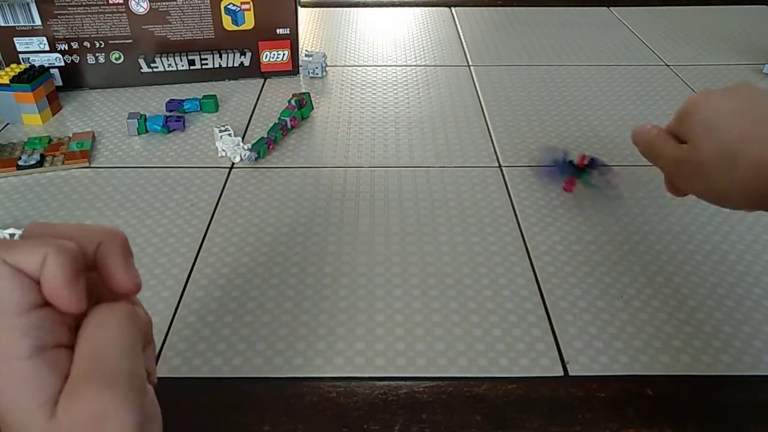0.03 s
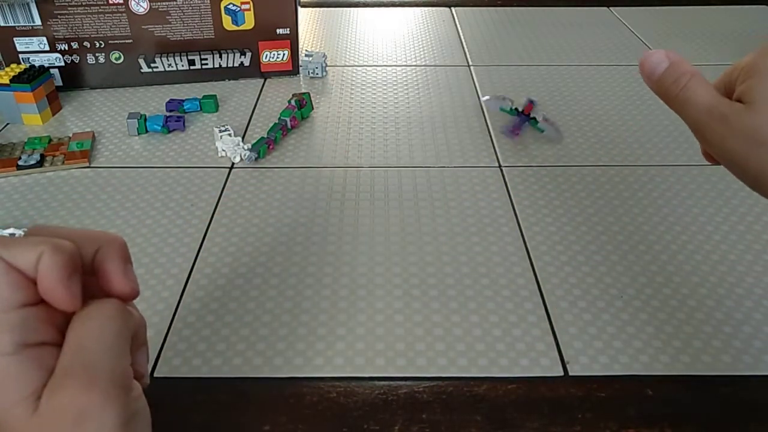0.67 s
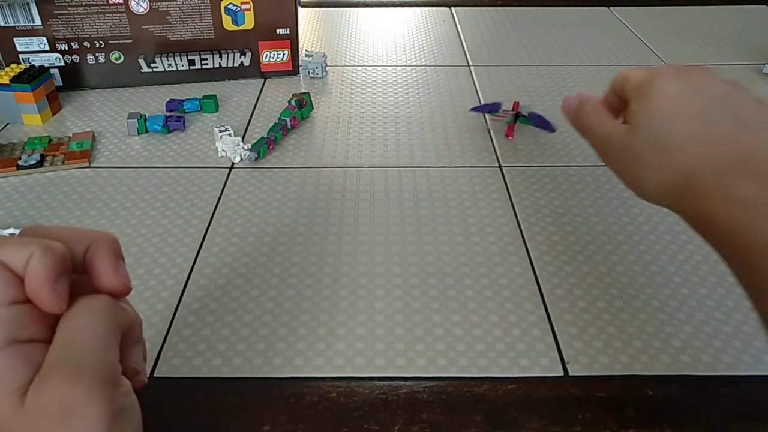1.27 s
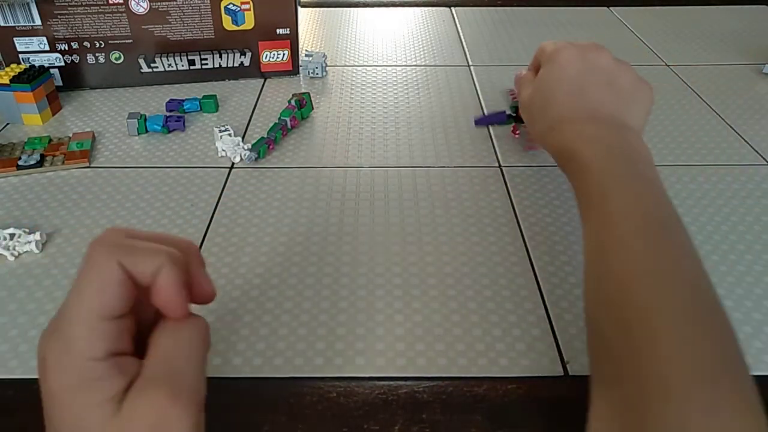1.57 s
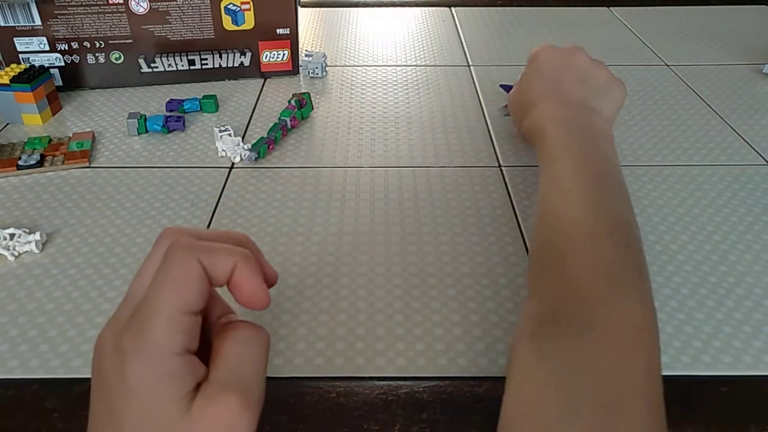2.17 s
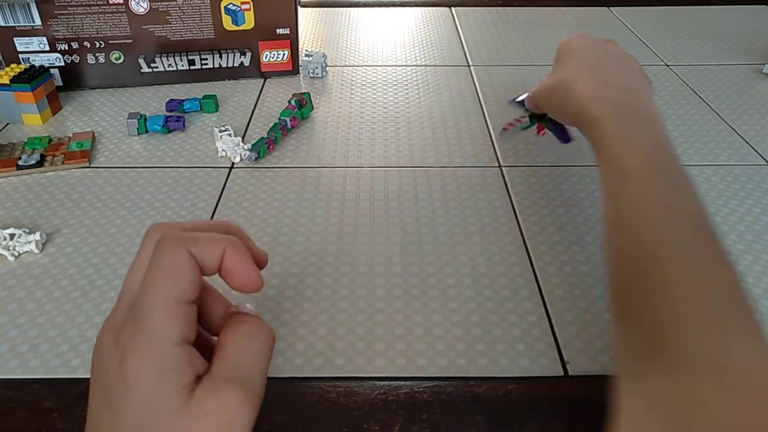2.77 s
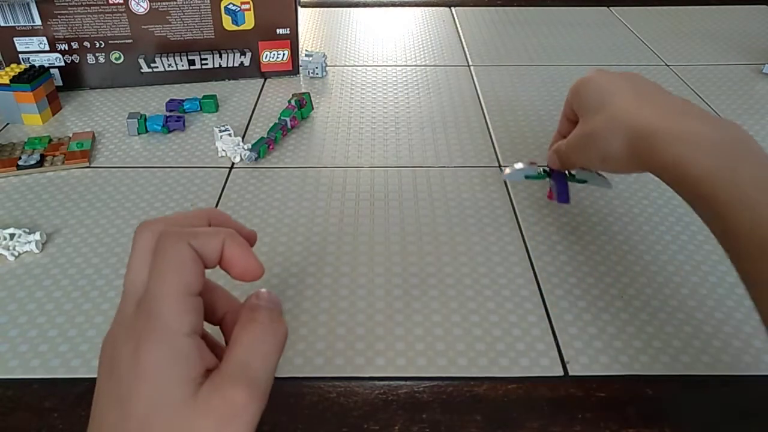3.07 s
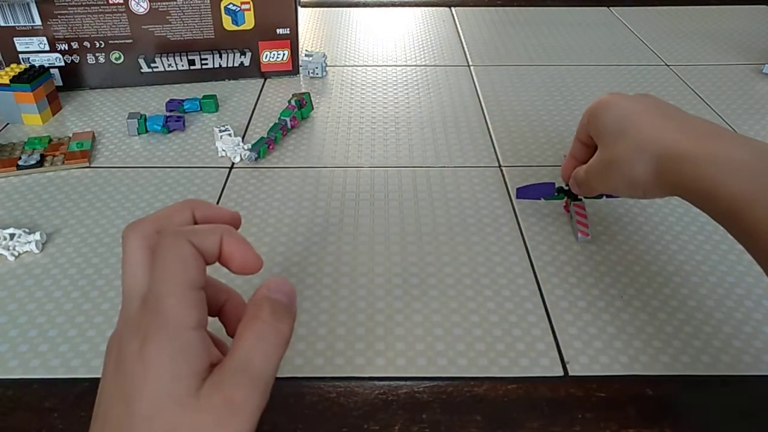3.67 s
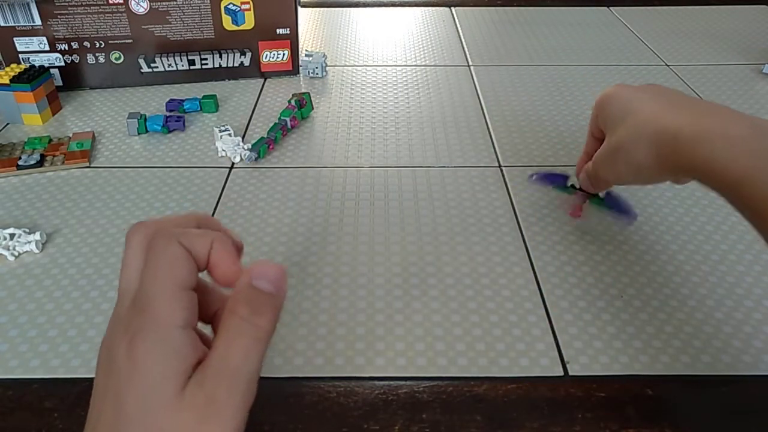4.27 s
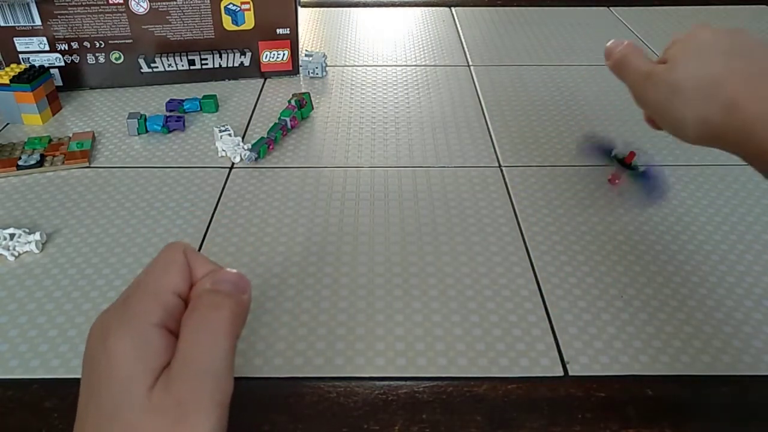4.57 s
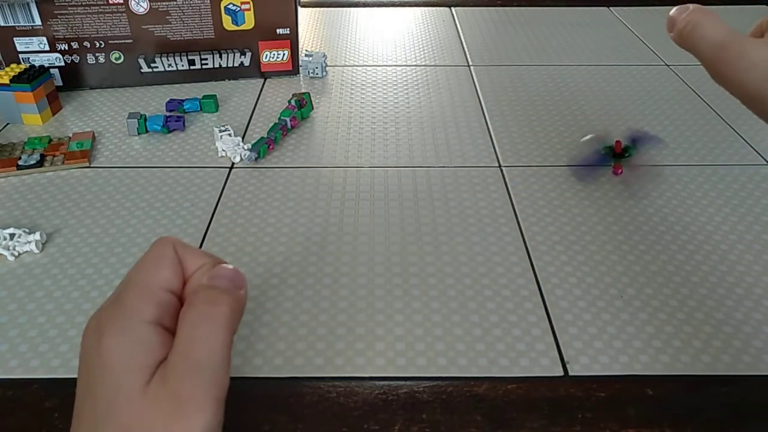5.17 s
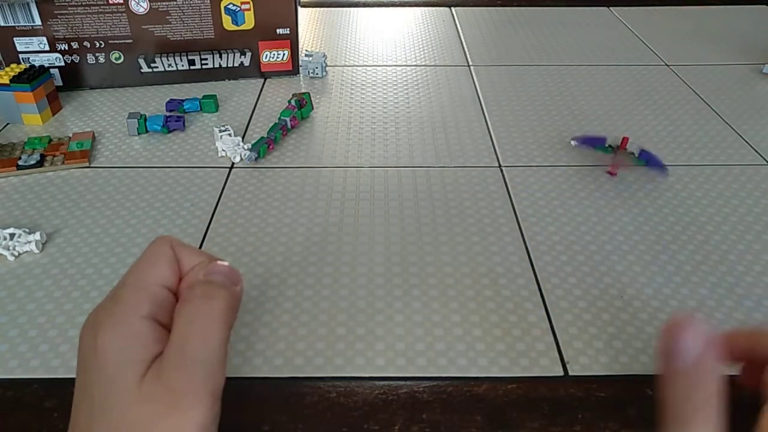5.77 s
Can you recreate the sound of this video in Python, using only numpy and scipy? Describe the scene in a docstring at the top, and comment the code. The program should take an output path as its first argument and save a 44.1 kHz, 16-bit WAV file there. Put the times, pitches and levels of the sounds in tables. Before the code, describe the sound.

Close by in a small, lively room, a toy of plastic bricks rattles across a table, each click carrying a slight low knock. The clatter thins out and stops, leaving a few handling clicks and faint rubs of fingers. The toy is spun again and skips in a short, dense flurry of clicks. Then a sleeve rustles softly and the table is bumped, over a faint hiss.

```python
"""A small winged toy of plastic bricks spins on a hard tabletop, clattering ever more slowly until it
settles. Each contact is a crack, a ring of plastic modes and a chirp and low boom from the table.
A hand picks the toy up, snaps its parts home and spins it again; it skips, then turns almost silently.
Fingers and a sleeve rustle, and the table is bumped near the end.
A small live room rings after every click, over a faint hiss."""
import sys
import numpy as np
from scipy import signal
from scipy.fft import rfft, irfft
from scipy.io import wavfile
from scipy.ndimage import uniform_filter1d

SR = 44100
rng = np.random.default_rng(int(sys.argv[2]) if len(sys.argv) > 2 else 0)


def bounce(signal):
    """Save signal as a 16-bit WAV file at the path given by the first command-line argument."""
    frames = np.transpose(np.atleast_2d(signal))
    limited = np.clip(frames, -1, 1)
    pcm = np.round(limited * 32767).astype(np.int16)
    wavfile.write(sys.argv[1], SR, pcm)


N = 257103


def toy(rooms, boom_slope=0.45, usual_blow_db=-45, blur_db=-3):
    """The toy clatters on the table: a click and a boom per contact, the room changing as it wanders."""
    out = np.zeros(N)
    for s, levels_db, send_db, ring, note_hz in contacts():
        chirp_db, wing_db, brick_db, _ = levels_db
        # a soft tap that leaves the bricks still rings purely; a hard one cracks
        purity_db = np.clip(0.7 * (max(chirp_db, wing_db) - brick_db) + 2, 0, 9)
        blow_db = (chirp_db + wing_db) / 2
        low_end = boom(usual_blow_db + boom_slope * (blow_db - usual_blow_db))
        add(out, s, low_end)
        add(out, s, click(levels_db, ring, note_hz, purity_db))
        # the toy sounds different in each direction, so its notes blur in the room
        send = low_end.copy()
        add(send, 0, click(levels_db, ring, note_hz, purity_db + blur_db))
        spot = int(2 * s) % len(rooms)  # a new spot every half second
        add(out, s, gain_of(send_db) * signal.fftconvolve(send, rooms[spot]))
    return out


# wing strikes and brick snaps: t/s, strength/dB, hardness (bricks over wing)/dB, wing note f/Hz
CLICKS = [(0.0, -39.5, 1, 2740), (0.0257, -32, 11.5, 2730), (0.0591, -33.5, 5, 3030),
          (0.099, -37.5, 4.5, 3980), (0.135, -32.5, 5, 3000), (0.173, -37, 6.5, 2800),
          (0.2104, -36, 9, 4090), (0.2544, -36.5, 10.5, 3920), (0.3025, -39, 11.5, 2660),
          (0.3559, -41, 10, 3510), (0.405, -39.5, 8, 3780), (0.464, -41.5, 10.5, 3370),
          (0.5214, -43.5, 8, 2820), (0.5931, -47.5, 2, 2620), (0.6292, -52.5, 5.5, 3680),
          (0.6645, -51, 5, 2660), (0.74, -48.5, 3.5, 3700), (0.813, -43, 2, 4050), (0.9363, -42.5, 2, 4360),
          (1.0393, -36.5, 2.5, 3880), (1.1414, -43.5, 4, 3830), (1.2115, -48.5, 2.5, 2470),
          (1.2539, -45.5, 3.5, 3850), (1.312, -39.5, 6, 4210), (1.32, -45, 2, 4370),
          (1.5026, -41.5, 2.5, 3860), (1.5722, -45, 1.5, 2730), (1.629, -52.5, -4, 4170),
          (1.6715, -60.5, 5, 3600), (1.7519, -45, 0.5, 3950), (1.8067, -56.5, 6.5, 2450),
          (1.9092, -39.5, 3, 2690), (2.1192, -51, -10, 4120), (2.1398, -47, -5, 2780),
          (2.44, -46.5, -1, 2720), (3.4598, -54, -11, 3760), (3.4887, -43.5, 8, 3600),
          (4.4083, -57, 9, 3720), (4.5323, -46, 11.5, 2970), (4.5542, -38, 10.5, 4400),
          (4.5798, -39, 6.5, 3980), (4.5842, -42, 0, 4050), (4.6842, -41, 11, 3440), (4.708, -35, 11, 4140),
          (4.7345, -37, 11.5, 3130), (4.761, -32.5, 7, 4830), (5.1618, -67.5, 12.5, 4700)]
# the peg of the fast, wobbling toy knocks on the table: t/s, strength/dB
KNOCKS = [(0.099, -38.5), (0.1728, -41), (0.2106, -42), (4.6083, -41.5), (4.6359, -40), (4.655, -43),
          (4.674, -47), (4.7343, -40), (4.801, -37.5), (4.8325, -36.5), (4.8622, -38.5), (4.8836, -42.5),
          (4.907, -49)]
# balance of a knock, the landing and a bounce: relative level/dB of tabletop, wings, bricks, edges
KNOCK_MIX = [-1, -2.5, -6, -17]
LANDING_MIX = [-37, -31.5, -38, -33.5]
BOUNCE_MIX = [-15.5, -1.5, -12, -9]


def contacts(landing_s=4.4576, bounce_gap_s=0.0204, first_bounce_db=-37, bounce_loss_db=2):
    """Every hit of the toy as (t/s, four part levels/dB, room send/dB, nominal ring/s, wing note/Hz)."""
    for s, db, hard_db, note_hz in CLICKS:
        levels_db = db + np.array([-13, 0, hard_db, hard_db - 5])
        harder_db = max(hard_db - 3, 0)  # beyond an ordinary click
        send_db = -2.5 - 0.08 * (db + 42) - 0.1255 * harder_db  # strong, hard clicks stand out drier
        ring = 0.019 * 0.5 ** (harder_db / 14)  # hard ones are tighter too
        yield s, levels_db, send_db, ring, note_hz
    for s, db in KNOCKS:
        yield s, db + np.array(KNOCK_MIX), -6, 0.024, 3950
    # flicked from the fingers, the toy lands flat with a dry smack
    yield landing_s, LANDING_MIX, -5.5, 0.005, 4080
    # then it bounces on one wing, evenly and ever more softly
    for k in range(4):
        levels_db = first_bounce_db - k * bounce_loss_db + np.array(BOUNCE_MIX)
        yield landing_s + (k + 1) * bounce_gap_s, levels_db, -7, 0.018, 4080


# bands of the tabletop, wings, bricks and edges: low f/Hz, high f/Hz
PART_BANDS = [(850, 2000), (2000, 5500), (5500, 12000), (12000, 16000)]
# resonances of the plastic: f/Hz, relative level/dB
TOY_MODES = [(2150, -8.5), (2650, 0), (3050, -6.5), (3600, 1), (4000, -1), (4450, -2.5), (5200, -4),
             (7400, -1), (8150, -1), (8750, 0.5), (9350, -2.5), (10100, 0), (10650, 3), (11400, -1),
             (12600, -6.5), (13250, -9), (15600, -19)]
# EQ of the noisy crack: f/Hz, gain/dB
CRACK_EQ = [(900, -7), (2100, -2), (3000, -1), (4200, -0.5), (5500, -1), (6600, -4), (7400, -2),
            (11000, -2.5), (13000, 0), (14400, -15), (15800, 3.5)]


def click(levels_db, ring, note_hz, purity_db, detune=0.018, scatter_db=2, chatter=0.37):
    """One contact: each part gives a short crack and rings, and the loose bricks rebound once."""
    t = np.arange(2048) / SR
    attack, bins = round(0.006 * SR), np.fft.rfftfreq(len(t), 1 / SR)
    hz, db = np.transpose(TOY_MODES)
    hz = hz * (1 + detune * rng.standard_normal(len(hz)))  # every contact holds the toy differently
    db = db + scatter_db * rng.standard_normal(len(hz))
    groups = [(hz > low) & (hz <= high) for low, high in PART_BANDS[1:]]
    wing, brick, edge = (evened(ringing(t, hz[group], db[group], t60=0.42 * ring)) for group in groups)
    # the wing that touches sounds a tight cluster of modes around its note
    cluster_hz = note_hz + 650 * np.array([0, -rng.uniform(0.18, 0.77), rng.uniform(0.17, 0.84)])
    note = ringing(t, cluster_hz, [0, -8, -8], t60=0.023) * np.minimum(t / 0.00074, 1)
    wing = wing + gain_of(purity_db - 1) * evened(note)
    rebound_s = rng.uniform(0.00027, 0.0024)
    for part in (brick, edge):
        add(part, rebound_s, chatter * min(ring / 0.02, 1) * part)
    tones = (chirp(t), wing, brick, edge)
    cracks_db = (-4 - purity_db, -5 - purity_db, -4, -1)  # noise against tone in each part
    crack_decay = gain_of(-60 * t / np.sqrt(0.045 * ring))
    out = np.zeros(len(t))
    for tone, (low, high), level_db, crack_db in zip(tones, PART_BANDS, levels_db, cracks_db):
        band = gain_of(read(CRACK_EQ, bins)) * ((bins > low) & (bins < high))
        crack = crack_decay * irfft(rfft(rng.standard_normal(len(t))) * band)
        part = evened(tone) + gain_of(crack_db) * evened(crack)
        attack_rms = np.sqrt(np.mean(part[:attack] ** 2))
        out += gain_of(level_db) * part / attack_rms
    return high_pass(out, corner_hz=785)  # parts this small radiate no bass


def ringing(t, hz, db, t60):
    """Struck plastic rings as a sum of dying modes, each with a random polarity."""
    weight = gain_of(db) * rng.choice([-1, 1], len(hz))
    return weight @ np.sin(2 * np.pi * hz[:, None] * t) * gain_of(-60 * t / t60)


def chirp(t, fall_s=0.00288, rise_s=0.0025):
    """Bending waves in the tabletop: highs outrun lows, so a tap arrives as a falling chirp."""
    sweep = 1100 + 1200 * np.exp(-t / fall_s)
    hz = sweep * rng.uniform(0.82, 1.068)
    return np.sin(2 * np.pi * np.cumsum(hz) / SR) * t * np.exp(-t / rise_s)


# body of the tabletop: f/Hz, gain/dB
BOOM_EQ = [(40, -28), (85, -4.5), (135, 1), (200, 0.5), (320, 1.5), (420, -1.5), (600, 1.5), (800, -8),
           (1100, -1.5), (2000, -45)]


def boom(blow_db, trim_db=-17, t60=0.16, rise_s=0.00033):
    """The tabletop answers a blow with a low, short boom."""
    t = np.arange(6144) / SR
    body = coloured(lambda hz: read(BOOM_EQ, hz), size=len(t))
    envelope = gain_of(blow_db + trim_db - 60 * t / t60) * (1 - np.exp(-t / rise_s))
    return high_pass(body * envelope, corner_hz=117)


# fingers and hand bump the toy and the table: t/s, relative level/dB, centre f/Hz, t60/s
BUMPS = [(1.875, -64, 1400, 0.15), (1.908, -58.5, 1380, .13), (2.427, -51.5, 1200, .065),
         (3.425, -62, 1100, 0.096), (3.458, -55, 1290, 0.094), (3.845, -71.5, 1390, .095),
         (3.938, -56.5, 1210, 0.046), (4.458, -44, 653, 0.04), (5.223, -58.5, 354, 0.031),
         (5.663, -47.5, 840, 0.092), (5.69, -58, 900, 0.23), (5.662, -56, 300, 0.062)]


def bumps(skirt_db=-24):
    """Soft flesh meets plastic or table: a slow attack and a dull, damped ring."""
    out, t = np.zeros(N), np.arange(16384) / SR
    for s, db, centre_hz, t60 in BUMPS:
        rise_s = 0.088 * t60
        width_octaves = 0.51 + 0.87 * max(np.log2(1240 / centre_hz), 0)  # low bumps are broader

        def bell_eq(hz):
            octaves = np.log2((hz + 1) / centre_hz)
            return np.maximum(-6 * (octaves / width_octaves) ** 2, skirt_db - 5 * np.maximum(octaves, 0))
        envelope = np.minimum(t / rise_s, 1) * gain_of(-60 * np.maximum(t - rise_s, 0) / t60)
        add(out, s, gain_of(db) * envelope * coloured(bell_eq, size=len(t)))
    return out


# strokes of fingers and sleeve: t/s, length/s, relative level/dB
RUBS = [(2.096, 0.082, -67.5), (2.392, 0.057, -67.5), (2.82, 0.08, -70), (3.397, .098, -62.5),
        (4.0, 0.11, -75), (4.102, .056, -66.5), (5.139, 0.3, -66.5), (5.325, .23, -60.5), (5.451, .42, -63),
        (5.605, 0.075, -65.5)]
# EQ of the rustle, ahead of its tilt: f/Hz, gain/dB
RUB_EQ = [(60, -31), (170, 2.5), (500, 1.5), (1300, 2.5), (3000, 0.5), (6000, -2), (10000, 3.5),
          (16000, -2.5)]


def rubs(grain_db=2.0, tilt_db_per_octave=-0.5, max_samples=16384):
    """Skin and cloth slide in short, grainy strokes."""
    def tilted_eq(hz):
        return read(RUB_EQ, hz) + tilt_db_per_octave * np.log2(np.maximum(hz, 300))
    out = np.zeros(N)
    for s, length, db in RUBS:
        size = round(length * SR)
        friction = coloured(tilted_eq, max_samples)[:size]
        grain = evened(uniform_filter1d(rng.standard_normal(max_samples), size=150))[:size]
        fades = signal.windows.tukey(len(friction), 0.8)
        add(out, s, gain_of(db + grain_db * grain) * friction * fades)
    return out


# reverb decay: f/Hz, t60/s
ROOM_T60 = [(200, 0.32), (530, 0.34), (1400, 0.39), (3700, 0.5), (8500, 0.36), (15000, 0.36)]
# early reflections off nearby surfaces: delay t/s, linear gain
ECHOES = [(.0068, 0.12), (.0092, 0.26), (0.0125, 0.18), (0.0096, 0.12), (0.0174, 0.061), (0.0216, 0.15),
          (0.031, 0.068)]
# tone of the room: f/Hz, gain/dB
ROOM_EQ = [(200, 8), (1300, 1.5), (3000, -1), (6000, 0.5), (8000, 2.5), (10500, -2.5), (13000, -2),
           (16000, -3.5)]


def room(predelay_s=0.003, build_s=0.0034, taps_per_s=6000, size=22000):
    """A small room's impulse response: early reflections and sparse taps that die band by band."""
    taps = rng.choice([-1., 1.], size) * (rng.random(size) < taps_per_s / SR)
    hz, t, spectra = signal.stft(taps, SR, nperseg=256)
    decay = gain_of(-60 * t / read(ROOM_T60, hz)[:, None])
    tail = signal.istft(spectra * decay, SR, nperseg=256)[1][:size]
    tail *= np.clip((np.arange(size) / SR - predelay_s) / build_s, 0, 1)
    tail /= np.linalg.norm(tail)
    for s, gain in ECHOES:
        add(tail, s + rng.uniform(-0.00041, 0.0004), np.array([gain]))
    eq = gain_of(read(ROOM_EQ, np.fft.rfftfreq(size, 1 / SR)))
    return irfft(rfft(tail) * eq, size)


# EQ of the noise floor: f/Hz, gain/dB
HISS_EQ = [(20, -17), (45, -5), (75, -11.5), (110, -6.5), (200, -9.5), (330, -10.5), (650, -10.5),
           (1000, -12.5), (1600, -14), (3000, -16), (8000, -16.5), (16000, -14.5)]


def hiss(level_db=-64):
    """A faint, steady bed of noise."""
    return gain_of(level_db) * coloured(lambda hz: read(HISS_EQ, hz), size=N)


def gain_of(db):
    """Decibels to amplitude."""
    return 10 ** (np.asarray(db) / 20)


def evened(x):
    """Scales to rms 1."""
    return x / np.sqrt(np.mean(x ** 2) + 1e-20)


def read(points, hz):
    """Reads a curve on a log-frequency axis."""
    f, value = np.transpose(points)
    return np.interp(np.log(hz + 1), np.log(f + 1), value)


def add(mix, s, sound):
    """Mixes a sound in at s seconds."""
    part = mix[max(round(s * SR), 0):][:len(sound)]
    part += sound[:len(part)]


def coloured(eq, size):
    """Noise of rms 1, shaped by eq(Hz) in dB."""
    hz = np.fft.rfftfreq(size, 1 / SR)
    return evened(irfft(rfft(rng.standard_normal(size)) * gain_of(eq(hz)), size))


def high_pass(x, corner_hz):
    """A low cut of three one-pole stages."""
    pole = np.exp(-np.pi * corner_hz / SR)
    for _ in range(3):
        x = signal.lfilter([np.sqrt(pole), -np.sqrt(pole)], [1, -pole], x)
    return x


def scene():
    """The mono mix: toy and hands in the room, over the hiss."""
    rooms = [room() for _ in range(5)]
    bed = hiss()
    hands = bumps() + rubs()
    hands_reverb = gain_of(-3.5) * signal.fftconvolve(hands, rooms[0])[:N]
    return (toy(rooms) + gain_of(2.5) * hands + hands_reverb + bed)[None]


def record(dry):
    """A steep high cut at 16150 Hz."""
    high_cut = signal.firwin(255, 16150, window=("kaiser", 8), fs=SR)
    return signal.oaconvolve(dry, high_cut[None], "same")


dry = scene()
out = record(dry)
bounce(out)
```